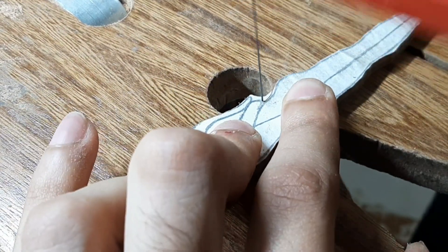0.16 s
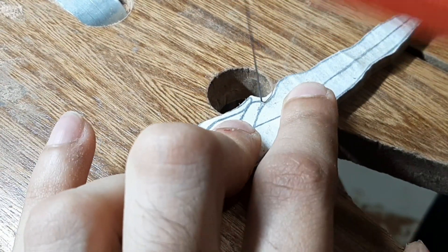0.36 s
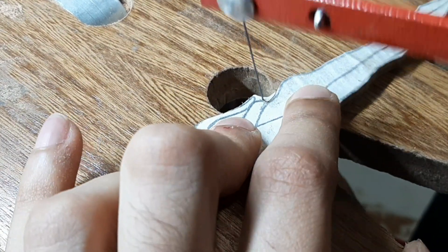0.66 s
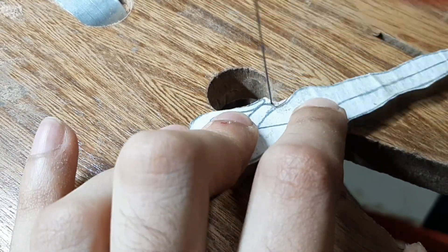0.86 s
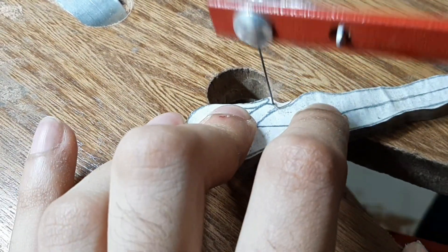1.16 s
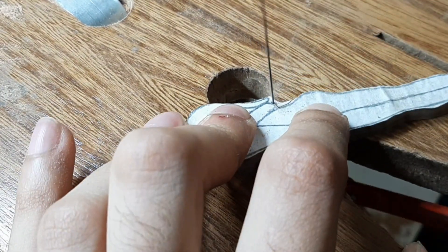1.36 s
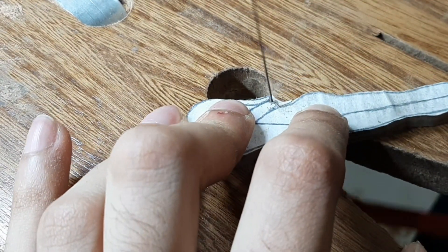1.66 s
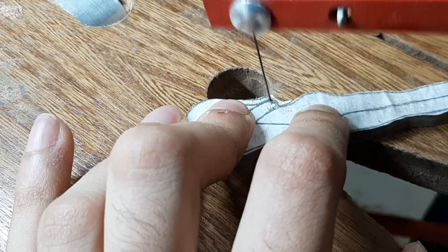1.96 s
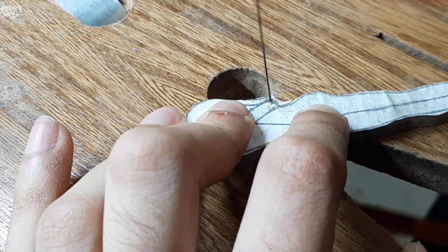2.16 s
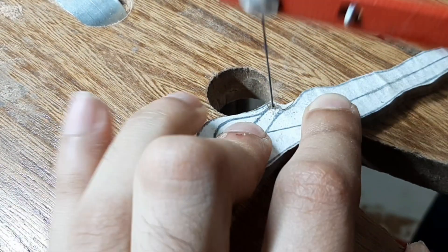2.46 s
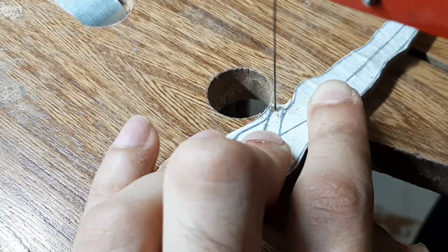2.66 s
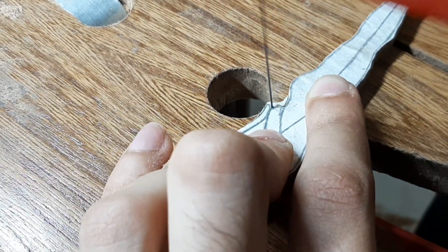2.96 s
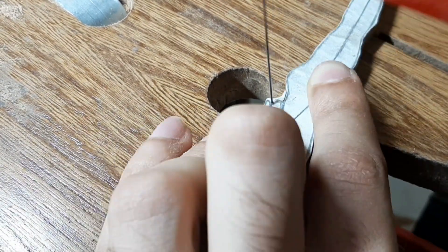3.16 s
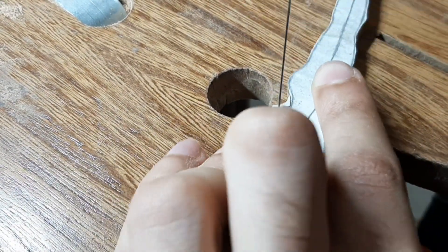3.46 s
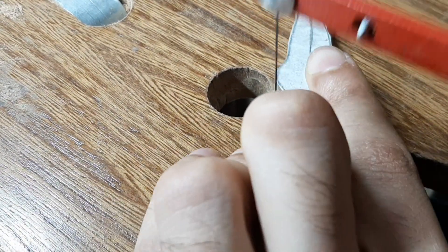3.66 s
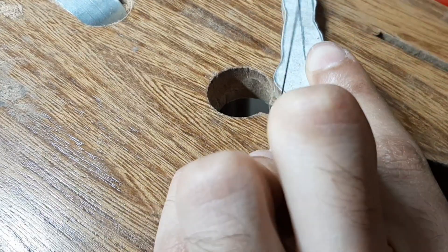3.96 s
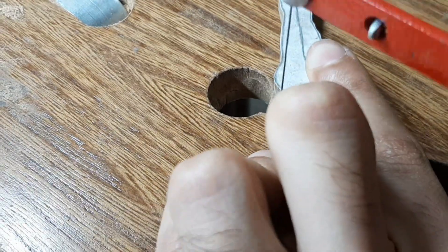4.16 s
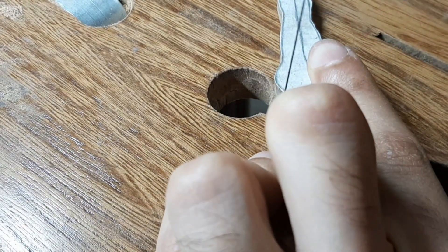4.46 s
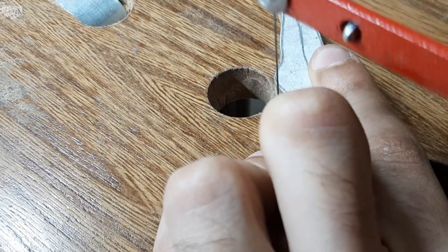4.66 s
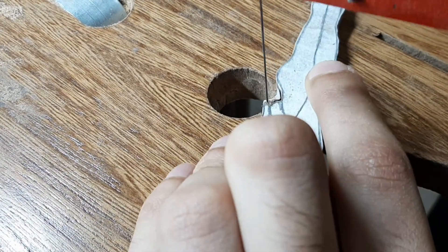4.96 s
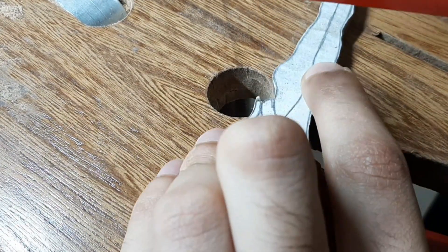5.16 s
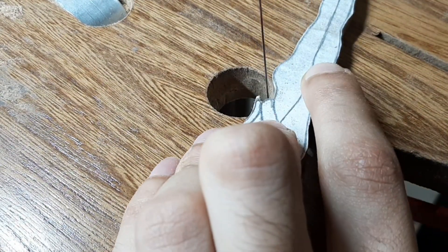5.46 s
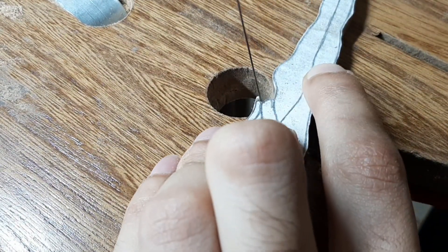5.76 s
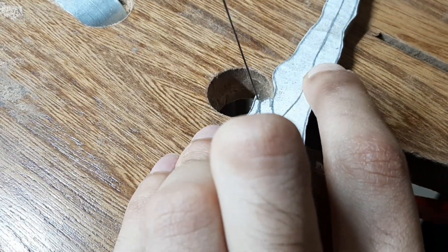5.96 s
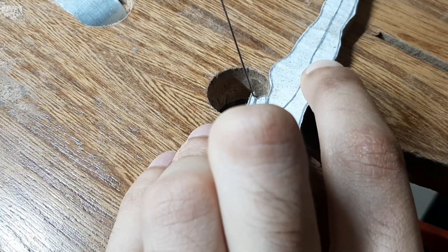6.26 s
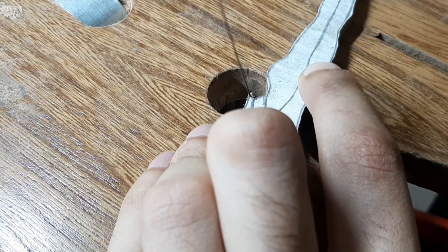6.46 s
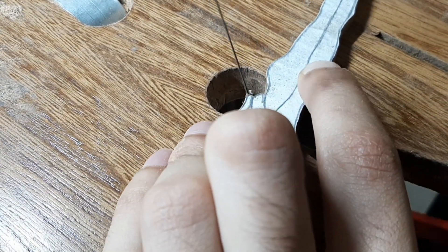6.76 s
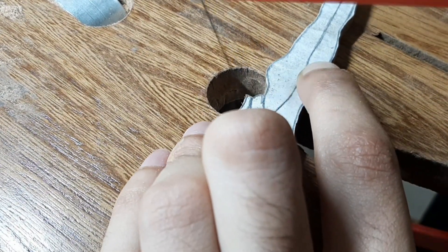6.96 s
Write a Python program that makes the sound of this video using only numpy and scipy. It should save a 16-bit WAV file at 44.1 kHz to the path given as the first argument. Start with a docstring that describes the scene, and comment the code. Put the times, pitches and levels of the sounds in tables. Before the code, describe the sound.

A fine hand saw rasps through thin wood in quick strokes, with a few knocks, a sharp snap and a short pause.

```python
"""Quick rasps and hisses fill a small workshop: a fine hand saw cuts a thin wooden figure on a board.
The teeth rasp on each cut and rub on each return, making the piece, saw frame and blade ring.
Now and then a tooth catches or chirps. The board drones under the teeth and is scuffed and knocked
as the piece is turned. Once the jammed blade snaps free, the frame bangs on the board, and the steel
tinks in the pause before the sawing goes on."""
import sys
import numpy as np
from scipy import signal
from scipy.fft import rfft, irfft
from scipy.io import wavfile
from scipy.ndimage import uniform_filter1d, map_coordinates

SR = 44100
rng = np.random.default_rng(int(sys.argv[2]) if len(sys.argv) > 2 else 0)


def unload_wav(signal):
    """Save mono or channel-first audio to the path in sys.argv[1] as 16-bit WAV at rate SR, clipped to [-1, 1]."""
    wavfile.write(
        sys.argv[1],
        SR,
        np.round(np.clip(np.atleast_2d(signal).T, -1, 1) * 32767).astype(np.int16),
    )


N = 313992
T = np.arange(N) / SR
HZ = np.fft.rfftfreq(16384, 1 / SR)
TOP_HZ = 15700

# Spells of even sawing: (start [s], end [s], first cut [dB], last cut [dB], extra midway [dB],
# return against cut [dB], treble [dB], board drone [dB], patter against stroke force [dB])
BOUTS = [(0.02, 0.274, -53, -55, 3.5, -3.5, 7.5, -57, -23),
         (0.273, 0.908, -49.5, -44, 1.5, -10, 6.5, -54.5, -18),
         (0.91, 1.308, -52.5, -46, -2, -4, 9.5, -52, -8.5),
         (1.31, 1.956, -45.5, -47.5, -1.5, -6.5, 10, -55, -16),
         (1.954, 2.334, -49.5, -55, 2, -11, 11.5, -58.5, -15),
         (2.337, 2.705, -56, -55, -3, -1, 8, -59.5, -14), (2.769, 2.92, -60, -60, -9, 4, 2.5, -63, -14),
         (3.071, 3.222, -61.5, -60, -14, -11, 4.5, -63, -7.5),
         (3.22, 3.388, -50.5, -51, 3, 2, 4.5, -56.5, -16.5), (3.393, 3.651, -44, -55, 2, -11, 9, -54, -2.5),
         (3.654, 4.038, -56, -50.5, -1.5, -2.5, 6.5, -56.5, -17.5),
         (4.062, 4.537, -51.5, -47, -1, -4.5, 5, -57, -16.5),
         (4.544, 4.911, -45, -47, 0.5, -9.5, 4, -54, -19.5),
         (4.912, 5.021, -54, -52, -10, -14.5, 4, -62.5, -11),
         (5.845, 6.085, -50.5, -53.5, 8, -12, -1.5, -62.5, -15),
         (6.254, 6.39, -51.5, -45, 0, -3, 0, -60.5, -15),
         (6.385, 7.102, -46, -42.5, -3.5, -7, 0.5, -51.5, -12.5)]
# The piece judders over the board: (peak time [s], level [dB], rise [s], fall [s], board drone [dB])
SCUFFS = [(0, -46, 0.065, 0.0035, -46), (0.211, -45, 0.044, 0.03, -61), (0.296, -64, 0.036, 0.052, -46.5),
          (1.121, -51.5, 0.062, 0.055, -52.5), (1.202, -47.5, 0.052, 0.031, -54.5),
          (2.866, -43.5, 0.034, 0.029, -43), (3.404, -42.5, 0.049, 0.041, -51.5),
          (3.555, -52, 0.035, 0.01, -46), (5.86, -55.5, 0.06, 0.086, -53)]
# Blows on the board; near its clamped edge they stir less bass, and the grip sets the clack's pitch:
# (time [s], level [dB], treble [dB], bass limit [Hz], clack pitch [Hz], clack [dB], clack decay [s])
KNOCKS = [(3.35, -25.5, -15, 129, 774, -38, 0.028), (3.513, -39, 4.5, 320.5, 692, -35, 0.016),
          (5.149, -24, 0, 82.4, 728, -24, 0.01), (5.168, -37.5, -3, 200, 1018, -32.5, 0.028),
          (5.188, -35, -13.5, 150, 403, -36.5, 0.043), (5.804, -43, 2, 149.5, 595, -44.5, .012),
          (7.073, -21, 7, 69.1, 661, -23, .011)]
# The board's resonances, the pitches it likes to ring at: (pitch [Hz], width [Hz], boost [dB])
BOARD_RESONANCES = [(104.5, 45, 12), (228.6, 24.9, 23.5), (392.4, 66, 10), (477, 21, 14), (750, 110, 9),
                    (1014, 81, 12), (1181, 79, 22.5), (3950, 310, 12.5)]
# Tone of the piece pattering on the board: (frequency [Hz], level [dB])
PATTER_TONE = [(170, -22), (320, 2), (700, 4), (850, 0), (1050, -4.5), (1500, 3), (4000, -58.5)]
# Tone of the blade sliding in the slot it has cut: (frequency [Hz], level [dB])
SLIP_TONE = [(200, -3.5), (1200, -4), (2000, -2.5), (3000, -13), (5000, -3), (10000, -7), (13000, -7.5),
             (16000, -29.5)]


def gain_of(db):
    return 10 ** (np.asarray(db) / 20)


def unit_level(x):
    """Scales a signal to an average power of 1."""
    return x / np.sqrt(np.mean(x ** 2) + 1e-20)


def curve_at(points, hz):
    """Joins (frequency, value) points by straight lines on a log-frequency axis."""
    point_hz, value = np.transpose(points)
    return np.interp(np.log(hz + 1), np.log(point_hz + 1), value)


def add(mix, s, sound):
    """Lays a sound into the mix at s seconds."""
    part = mix[..., max(round(s * SR), 0):][..., :sound.shape[-1]]
    part += sound[..., :part.shape[-1]]


def body(tone, resonances=()):
    """How an object answers one sharp tap, given its broad tone and narrow resonances."""
    peaks_db = sum(boost / (1 + (2 * (HZ - hz) / width) ** 2) for hz, width, boost in resonances)
    db = curve_at(tone, HZ) + peaks_db
    log_gain = np.log(gain_of(np.maximum(np.r_[db, db[-2:0:-1]], -100)))
    spectrum = np.exp(signal.hilbert(log_gain).conj())  # no sound comes before the tap
    response = np.fft.ifft(spectrum).real[:len(HZ)]
    return response / np.linalg.norm(response)


def ring(force, response):
    """Makes an object or a room ring with a force."""
    return signal.oaconvolve(np.atleast_2d(force), np.atleast_2d(response), axes=1)[:, :N]


def resonate(x, hz, width_hz):
    """Rings at one steady or gliding pitch."""
    decay = np.exp(-np.pi * width_hz / SR)
    spin = np.exp(2j * np.pi * np.cumsum(hz * np.ones(N)) / SR)
    return (spin * signal.lfilter([np.sqrt(2 * (1 - decay ** 2))], [1, -decay], x / spin + 1e-18)).real


def band(x, low_hz, high_hz):
    return signal.sosfilt(signal.butter(2, [low_hz, high_hz], "band", fs=SR, output="sos"), x)


def brighten(x, treble_db, above_hz):
    treble = signal.sosfiltfilt(signal.butter(2, above_hz, "high", fs=SR, output="sos"), x)
    return x + (gain_of(treble_db) - 1) * treble


def wander(rate_hz):
    """A smooth random wobble."""
    keep_slow = np.exp(-(np.fft.rfftfreq(N, 1 / SR) / rate_hz) ** 2)
    return unit_level(irfft(rfft(rng.standard_normal(N)) * keep_slow, N))


def clicks(per_s, spread_db):
    """Clicks at random moments; the spread makes their sizes uneven."""
    size = gain_of(spread_db * np.minimum(rng.exponential(1, N), 4))
    return unit_level(size * rng.choice([-1, 1], N) * (rng.random(N) < per_s / SR))


def swell(s, rise, fall):
    """A smooth rise to 1 at s seconds, and a smooth fall."""
    return np.exp(-np.minimum(((T - s) / np.where(T < s, rise, fall)) ** 2, 50))


def bout_curve(column):
    """One column of BOUTS, held through each bout and joined across the gaps."""
    rows = np.array(BOUTS)
    return np.interp(T, np.sort(rows[:, :2].ravel()), np.repeat(rows[:, column], 2))


def still_room():
    """The faint, steady hush of the workshop."""
    # Tone of the hush: (frequency [Hz], level [dB])
    hush_tone = [(30, -19), (937, -27.5), (16000, -39.5)]
    return ring(rng.standard_normal((2, N)), body(hush_tone))


def room_echo(x, alike_below_hz=1200):
    """Dense echoes off nearby walls; the bass is alike on both sides."""
    # How long echoes last: (frequency [Hz], time to fade by 60 dB [s])
    fade_times = [(100, 0.53), (500, 0.32), (1500, 0.34), (14000, 0.14)]
    count = SR // 2
    echoes = rng.choice([-1., 1.], (2, count)) * (rng.random((2, count)) < 5000 / SR) * (T[:count] > .002)
    hz, t, bands = signal.stft(echoes, SR, nperseg=256)
    alike = np.exp(-(hz[:, None] / alike_below_hz) ** 2)
    bands[1] = alike * bands[0] + np.sqrt(1 - alike ** 2) * bands[1]
    fade = gain_of(-60 * t / curve_at(fade_times, hz)[:, None])
    tail = signal.istft(bands * fade, SR, nperseg=256)[1]
    return ring(x, tail / np.linalg.norm(tail, axis=1, keepdims=True))


def drone(speed, drag, release_s=0.0092, left_db=0.87):
    """The blade's drag shakes the board's low notes, most at mid-stroke; so does each scuff."""
    # Tone of the shaken board: (frequency [Hz], level [dB])
    drone_tone = [(30, -34), (60, -18), (100, -2.5), (150, 5), (280, -16.5), (1000, -14), (2200, -48)]
    power = (drag * (1 + 0.098 * (2 * speed - 1))) ** 2
    power += sum((gain_of(db) * swell(s, rise, fall)) ** 2 for s, _, rise, fall, db in SCUFFS)
    decay = np.exp(-1 / (release_s * SR))
    level = np.sqrt(signal.lfilter([1 - decay], [1, -decay], power))
    shared, left, right = (clicks(1500, spread_db=2) for _ in range(3))
    shake = level * unit_level(shared + 0.14 * np.array([left, right]))
    return ring(shake, body(drone_tone, BOARD_RESONANCES)) * gain_of([[left_db], [-left_db]])


def struck_board(boost_kept=0.45, hand_hz=330):
    """How the board answers a blow; the holding hand damps its ringing, the low notes most."""
    # Tone of struck wood: (frequency [Hz], level [dB])
    wood_tone = [(30, -40), (70, -6.5), (115, 1.5), (230, 2), (400, -5), (680, -4), (1000, -9.5),
                 (1500, -14.5), (2800, -9.5), (3400, -21), (15000, -48.5)]
    damped = [(hz, width, boost * boost_kept * hz ** 2 / (hz ** 2 + hand_hz ** 2))
              for hz, width, boost in BOARD_RESONANCES]
    return body(wood_tone, damped)


def scuffs(left_db=5):
    """The piece sticks and slips on the board in swells of tiny blows, off to the left."""
    level = sum(gain_of(db) * swell(s, rise, fall) for s, db, rise, fall, _ in SCUFFS)
    force = band(level * clicks(2500, spread_db=0), 300, 7000)
    return ring(force, struck_board()) * gain_of([[left_db], [-left_db]])


def groans(waver=0.048):
    """Pressed round, the piece sticks and slips regularly: a short, unsteady tone."""
    # Groans of the wood: (peak time [s], pitch [Hz], level [dB], half length [s])
    notes = [(5.864, 226.7, -46.5, 0.044), (6.033, 436.4, -52, 0.032)]
    wobbly_time = np.cumsum(1 + waver * wander(79)) / SR
    return sum(gain_of(db) * swell(s, half, half) * np.sin(2 * np.pi * hz * wobbly_time)
               for s, hz, db, half in notes)


def patter(force):
    """Held loosely, the piece patters on the board under each stroke."""
    looseness = gain_of(bout_curve(column=8))
    return ring(force * looseness * clicks(600, spread_db=2.5), body(PATTER_TONE))


def knocks(tap=0.55, rattle_s=0.0055, blow_s=0.014):
    """A sharp blow and a brief rattle of the loose piece ring the board."""
    force, t = np.zeros(N), T[:SR // 8]
    for s, db, treble_db, low_hz, *_ in KNOCKS:
        rattle = band(rng.standard_normal(len(t)) * np.exp(-t / rattle_s), 380, TOP_HZ)
        blow = rattle / np.linalg.norm(rattle)
        blow[0] += tap
        blow = band(blow, low_hz, TOP_HZ)
        blow += (gain_of(treble_db) - 1) * band(blow, 1800, TOP_HZ)
        add(force, s, gain_of(db) * np.sqrt(blow_s * SR / 2) * blow)
    return ring(force, struck_board())


def clacks():
    """At each blow the piece rings on one note."""
    notes, t = np.zeros(N), T[:SR // 2]
    for s, *_, hz, db, ring_s in KNOCKS:
        add(notes, s, gain_of(db) * np.exp(-t / ring_s) * np.sin(2 * np.pi * hz * t))
    return notes


def catches(grit_s=0.012):
    """A caught tooth lifts the piece, which drops back in a short, gritty patter."""
    # Jolts of the piece: (time [s], level [dB])
    jolts = [(1.841, -47), (1.967, -46.5), (5.825, -49), (5.9, -48), (5.975, -53), (6.393, -51),
             (6.486, -51), (6.516, -42), (6.63, -54), (6.743, -48), (6.873, -49.5), (6.988, -44)]
    level, t = np.zeros(N), T[:SR // 8]
    for s, db in jolts:
        add(level, s, gain_of(db) * np.exp(-t / grit_s))
    return ring(level * clicks(900, spread_db=-6), body(PATTER_TONE))


def chirps(waver=.06):
    """Single teeth squeak briefly against the wood."""
    # Tooth squeaks: (time [s], pitch [Hz], level [dB], half length [s])
    squeaks = [(1.019, 5660, -38.5, 0.0015), (2.365, 2486, -37.5, 0.002)]
    wobbly_time = np.cumsum(1 + waver * wander(900)) / SR
    return sum(gain_of(db) * swell(s, half, half) * np.sin(2 * np.pi * hz * wobbly_time)
               for s, hz, db, half in squeaks)


def tinks(chatter_s=0.0085):
    """A slack hand lets the blade chatter briefly in its slot; the steel rings."""
    # Light touches on the steel: (time [s], level [dB])
    touches = [(5.609, -48.5), (5.655, -66)]
    # Resonances of the short length of blade in the slot: (pitch [Hz], width [Hz], boost [dB])
    steel_resonances = [(3620, 800, 32), (7230, 680, 27), (10700, 1000, 22)]
    force, t = np.zeros(N), T[:SR // 8]
    for s, db in touches:
        add(force, s, gain_of(db) * np.exp(-t / chatter_s))
    return ring(force * rng.standard_normal(N), body(SLIP_TONE, steel_resonances))


def frame_resonances(across):
    """Piece and saw frame ring differently for a cut along or across the grain."""
    # Their resonances: (pitch [Hz], width [Hz], boost along [dB], boost across [dB])
    resonances = [(1028, 130, 7, 10), (1203, 70, 19, 11), (1530, 80, 16, 15), (1902, 60, 4, 11),
                  (2177, 130, 1, 5), (2508, 150, 9, 8), (2960, 300, 9, 7), (3821, 130, 14, 8),
                  (4650, 380, 8, 10), (5400, 300, -3, 4)]
    return [(hz, width, boosts[across]) for hz, width, *boosts in resonances]


def slips(crack_s=.0007):
    """The jammed blade lets go with a bright crack and rushes through its slot."""
    # Slips of the blade: (time [s], crack [dB], rush [dB], rush length [s])
    releases = [(3.348, -33, -49, 0.015), (3.367, -39, -34.5, 0.0054), (3.413, -37, -37.5, 0.022),
                (5.1149, -25, -33.5, 0.06), (7.0111, -42, -48, 0.0051)]
    crack, rush, t = np.zeros(N), np.zeros(N), T[:SR // 8]
    for s, crack_db, rush_db, length in releases:
        add(crack, s, gain_of(crack_db) * np.exp(-t / crack_s))
        add(rush, s, gain_of(rush_db) * np.exp(-(t / length) ** 4))
    fizz = unit_level(band(rng.standard_normal((2, N)), 8500, 12800))
    frame = body(SLIP_TONE, frame_resonances(across=False))
    return 2 * crack * fizz + ring(rush * rng.standard_normal((2, N)), frame)


def strokes(usual_cycle_s=.126, cut_share=.56):
    """Lists every cut and return: (start [s], length [s], level [dB], drone [dB], whether it cuts)."""
    # The blade is drawn back on its own between bouts: (start [s], length [s], level [dB])
    lone_returns = [(2.826, 0.07, -48), (2.922, 0.041, -56.5), (3.013, 0.045, -56.5), (6.182, 0.092, -58)]
    rows = [(s, length, db, db - 10.5, False) for s, length, db in lone_returns]
    for start, end, first_db, last_db, arch_db, return_db, _, drone_db, _ in BOUTS:
        count = max(round((end - start) / usual_cycle_s), 1)
        cycle_s, progress = (end - start) / count, np.linspace(0, 1, count)
        pressure_db = first_db + (last_db - first_db) * progress + arch_db * np.sin(np.pi * progress)
        mean_db, cut_s = pressure_db.mean(), cycle_s * cut_share
        for k, push_db in enumerate(pressure_db - mean_db):
            s = start + k * cycle_s
            drag_db = drone_db + 0.73 * push_db  # pressing harder lifts the drone more than the return
            back_db = mean_db + return_db + 0.16 * push_db
            rows.append((s, cut_s, mean_db + push_db, drag_db, True))
            rows.append((s + cut_s, cycle_s - cut_s, back_db, drag_db - 2, False))
    return rows


def arm(speed_spread=.08):
    """The arm drives the blade: it stops at each end, flexes, then bites hardest early in the cut."""
    speed, cut, back, drag = np.zeros((4, N))
    for s, length, db, drone_db, cutting in strokes():
        skew, sharpness, flex_s = (.58, 2.3, .004) if cutting else (.85, .65, 0)  # returns swell evenly
        progress = np.linspace(0, 1, int(length * SR))
        top_speed = 1 + speed_spread * rng.standard_normal()
        force = unit_level(abs(np.sin(np.pi * progress ** skew)) ** sharpness)
        add(speed, s, top_speed * abs(np.sin(np.pi * progress)) ** .45)
        add(cut if cutting else back, s + flex_s, gain_of(db) * force)
        add(drag, s, gain_of(drone_db) * np.ones_like(progress))
    return speed, cut, back, drag


def singing(bite, width_hz=80, sag_hz_per_s=300):
    """Gripped firmly, the piece rings with the teeth, sinking in pitch as the cut advances."""
    # Firm grips: (peak time [s], half length [s], pitch [Hz], level against the rasp [dB])
    grips = [(0.727, 0.17, 1184, -1.5), (1.985, 0.13, 1023, -4.5), (4.635, 0.26, 1060, -1)]
    drive = band(bite, 710, 1600)
    return sum(gain_of(db) * swell(s, half, half) * resonate(drive, hz - sag_hz_per_s * (T - s), width_hz)
               for s, half, hz, db in grips)


def flexing(x, speed, stroke_shift=.012, chance_shift=.009):
    """Sawing flexes piece and frame, so their pitches rise at mid-stroke and vary between strokes."""
    lead = np.cumsum(stroke_shift * speed + chance_shift * wander(8.1))
    lead -= uniform_filter1d(lead, SR // 4, mode="nearest")  # keeps the strokes on time
    return np.array([map_coordinates(side, [np.arange(N) + lead], order=3) for side in x])


def blade_colour(x):
    """Bending and twisting move the blade's two high resonances, while two narrow hollows in the treble hiss
    deepen and fade."""
    # Resonances of the bending blade:
    # (time [s], lower pitch [Hz], its boost [dB], upper pitch [Hz], its boost [dB], hollow depth [dB])
    bends = [(.9, 9000, 7, 10870, 4.5, -2), (1.2, 9170, 6.5, 10500, 5, 8.5), (2.22, 8800, 11, 10690, 3, 10),
             (2.42, 9270, 8.5, 13100, 4, -2.5), (3.4, 9800, 0, 12100, 6.5, 3.5),
             (4.499, 8000, 3, 11700, 8.5, 2), (5.85, 8766, 6.5, 11210, 8.5, 1)]
    # Hollows in the hiss: (frequency [Hz], width [Hz])
    hollows = [(5650, 590), (11950, 520)]
    hz, t, bands = signal.stft(x, SR, nperseg=512)
    times, *columns = np.transpose(bends)
    lower_hz, lower_db, upper_hz, upper_db, hollow_db = (np.interp(t, times, c) for c in columns)

    def hump(centre_hz, width_hz):
        return np.exp(-((hz[:, None] - centre_hz) / width_hz) ** 2)

    db = lower_db * hump(lower_hz, 650) + upper_db * hump(upper_hz, 720)
    db -= hollow_db * sum(hump(*hollow) for hollow in hollows)
    # as the contact slides, the wood's ring swells unevenly, in patches about 340 Hz by 45 ms
    patches = uniform_filter1d(rng.standard_normal(db.shape), 4, axis=0)
    patches = unit_level(uniform_filter1d(patches, 8, axis=1))
    db += (1.9 + 1.1 * hump(0, 6000)) * patches
    return signal.istft(bands * gain_of(db), SR, nperseg=512)[1][:, :N]


def saw(speed, cut, back, teeth_per_s=2900, jitter=.065, rough_db=1.48):
    """On the cut, teeth strike in step with blade speed and tear fibres; on the return they only rub."""
    # Tone of the rasp along the grain: (frequency [Hz], level [dB])
    along_tone = [(180, -22), (700, -2.5), (900, -8), (2000, 6), (3300, 4.5), (6600, -0.5), (8500, -6.5),
                  (13400, 0), (16000, -13.5)]
    # Tone of the rasp across the grain: (frequency [Hz], level [dB])
    across_tone = [(180, -34.5), (700, -5.5), (950, -4.5), (2200, 6.5), (3300, 3), (5200, 4), (6600, 0),
                   (12500, -0.5), (15000, -7), (16000, -27.5)]
    # The piece is turned across the grain: (start [s], end [s])
    turn_times = [2.2, 3.7]
    teeth_passed = np.cumsum(teeth_per_s * speed * (1 + jitter * wander(300))) / SR
    strikes = np.diff(np.floor(teeth_passed), prepend=0) * gain_of(2.8 * rng.standard_normal((2, N)))
    strikes = unit_level(strikes - uniform_filter1d(strikes, 64))
    # fibres on the two faces of the slot send their sound to different sides
    shared, left, right = (clicks(5000, spread_db=1.5) for _ in range(3))
    fibres = unit_level(shared + np.array([left, right]))
    bite = cut * unit_level(fibres + gain_of(1) * strikes) + back * fibres
    bite *= gain_of(rough_db * wander(120))
    angle = np.interp(T, turn_times, [0, np.pi / 2])
    along = body(along_tone, frame_resonances(across=False))
    across = body(across_tone, frame_resonances(across=True))
    rasp = 0
    for response, share in (along, np.cos(angle) ** 2), (across, np.sin(angle) ** 2):
        rasp += ring(bite * share, response) / np.linalg.norm(band(response, 1800, 5000))
    free_blade = gain_of(-9) * resonate(back * fibres, hz=3880, width_hz=90)  # rings on the return
    rasp = blade_colour(flexing(rasp + free_blade, speed))
    return brighten(rasp, treble_db=bout_curve(column=6), above_hz=6200) + singing(bite)


def scene():
    """Saw, board and steel sound close by, over the workshop's echo and hush."""
    speed, cut, back, drag = arm()
    rasp = saw(speed, cut, back)
    board = gain_of(-0.5) * knocks() + gain_of(-1.5) * scuffs() + patter(cut + back) + catches()
    steel = slips() + chirps() + gain_of(-2) * tinks()
    board_drone = drone(speed, drag)
    to_walls = gain_of(-10) * rasp + gain_of(-3.5) * board + gain_of(-7.5) * steel
    echo = room_echo(brighten(to_walls, 4.5, above_hz=5070))  # hard walls throw back the treble
    hush = gain_of(-78) * still_room()
    return rasp + board + clacks() + groans() + steel + board_drone + echo + hush


def suppress_noise(x, threshold_db=-93, depth_db=-12):
    """Turns down very faint frequency bands, which cuts fading sounds short."""
    bands = signal.stft(x, SR, nperseg=512)[2]
    power = uniform_filter1d(np.mean(abs(bands) ** 2, axis=0), 5, axis=0)
    gain = np.maximum(power / (power + gain_of(threshold_db) ** 2), gain_of(depth_db))
    return signal.istft(bands * gain, SR, nperseg=512)[1][:, :N]


def record(dry, lag_s=0.00011, left_db=0.57):
    """The saw is nearer the left microphone; faint noise is turned down and the top treble cut off."""
    delay = np.exp(-2j * np.pi * np.fft.rfftfreq(N, 1 / SR) * lag_s)
    right = irfft(rfft(dry[1]) * delay, N)
    pair = suppress_noise(np.array([dry[0] * gain_of(left_db), right / gain_of(left_db)]))
    treble_cut = signal.firwin(511, TOP_HZ, window=("kaiser", 9), fs=SR)
    return signal.oaconvolve(pair, treble_cut[None], "same")


dry = scene()
out = record(dry)
unload_wav(out)
```